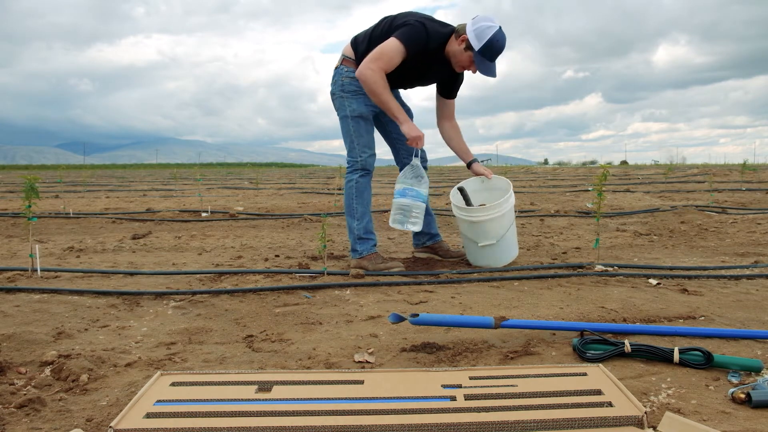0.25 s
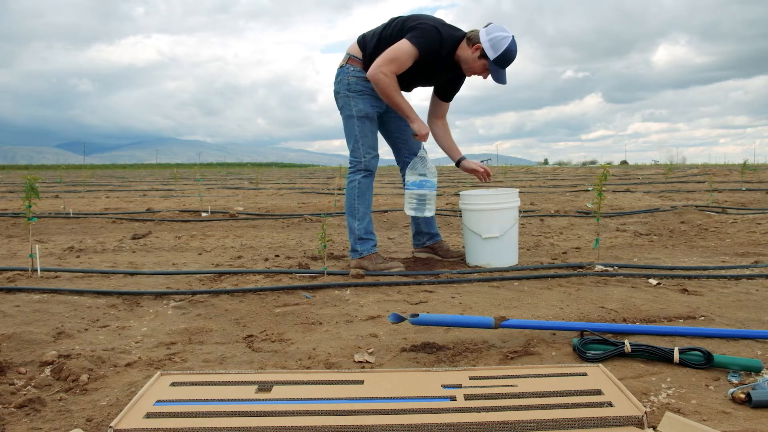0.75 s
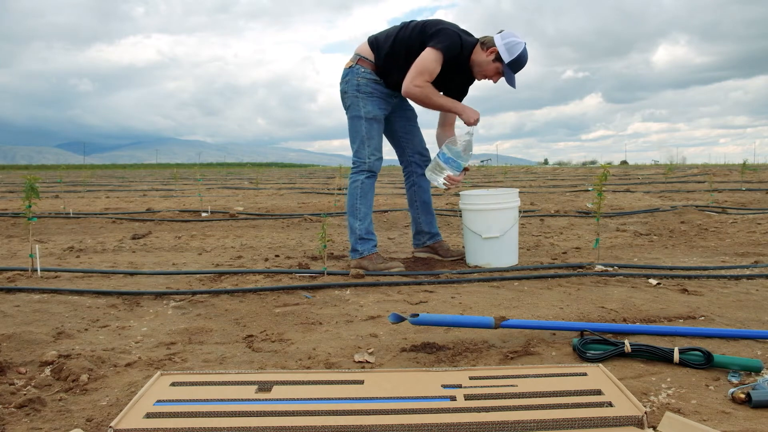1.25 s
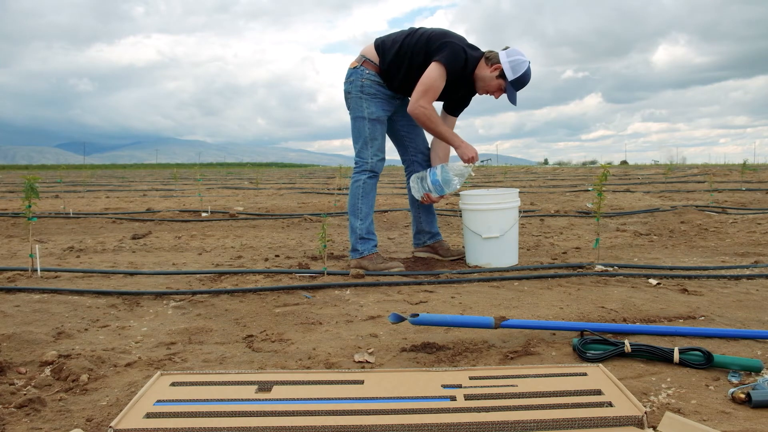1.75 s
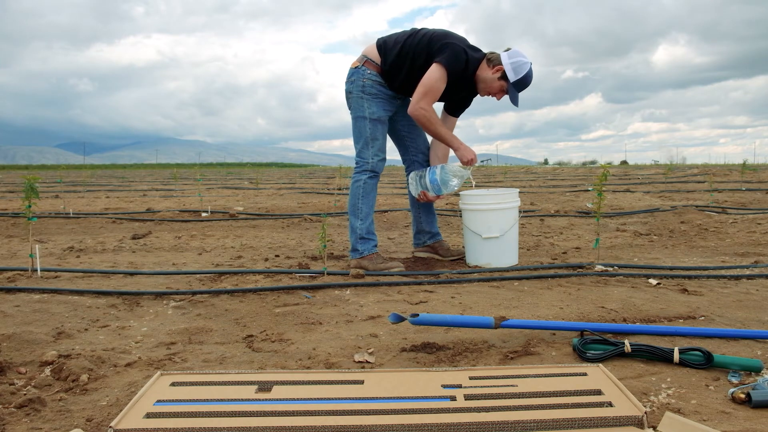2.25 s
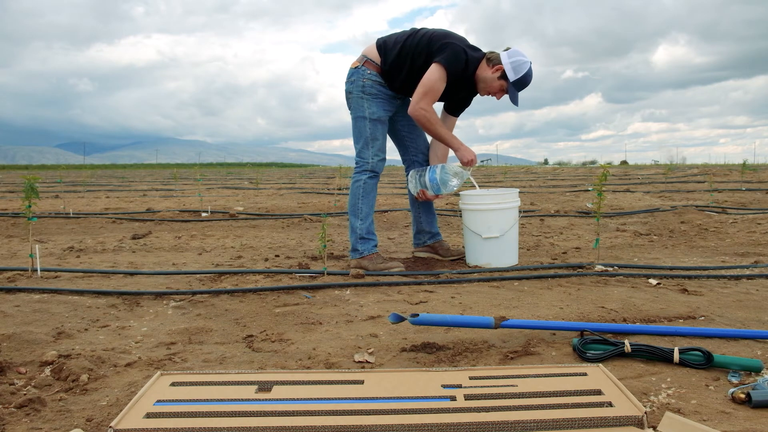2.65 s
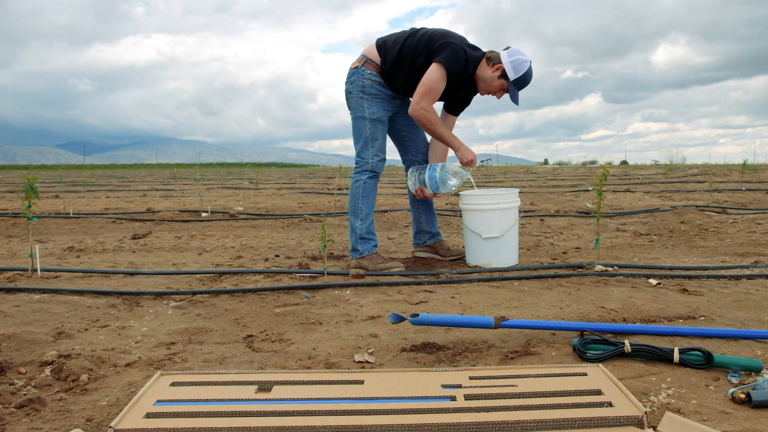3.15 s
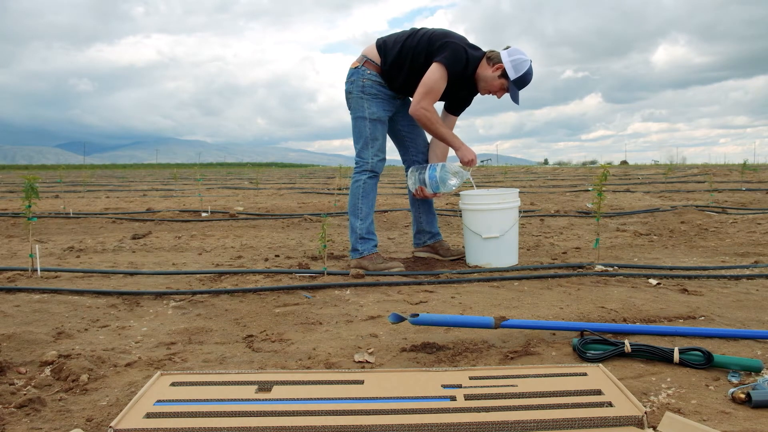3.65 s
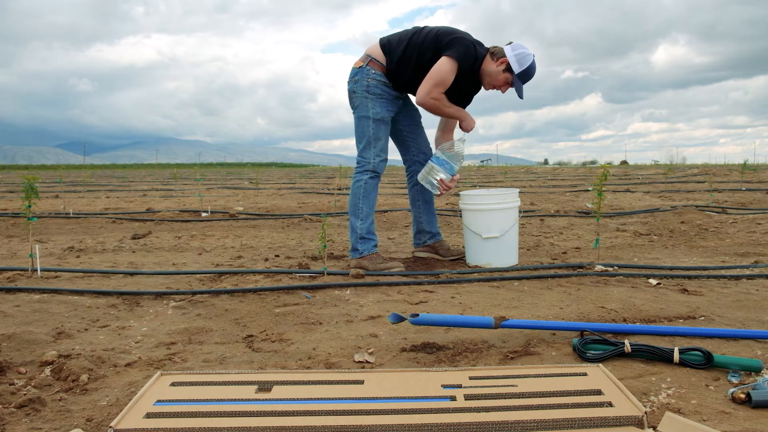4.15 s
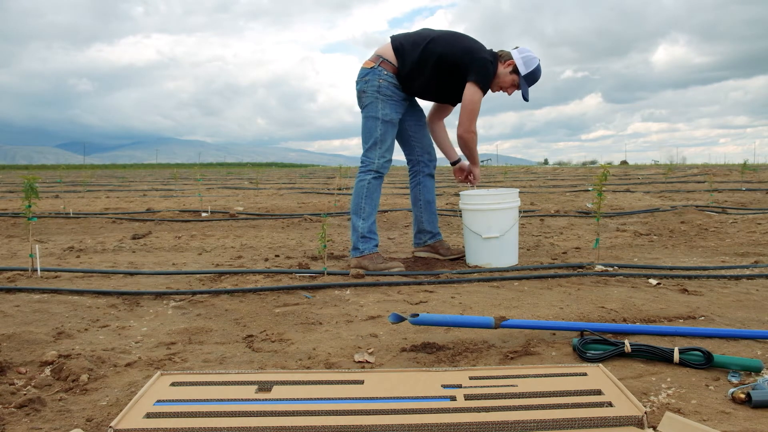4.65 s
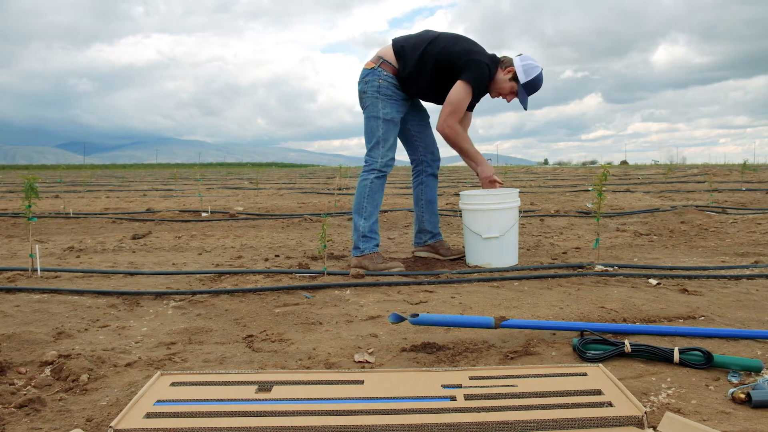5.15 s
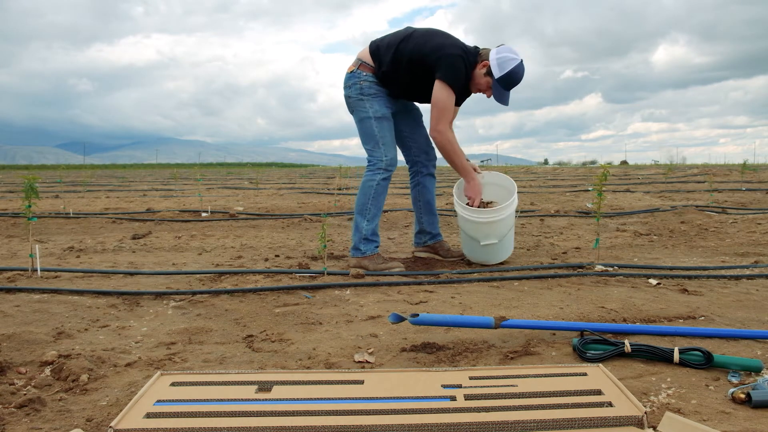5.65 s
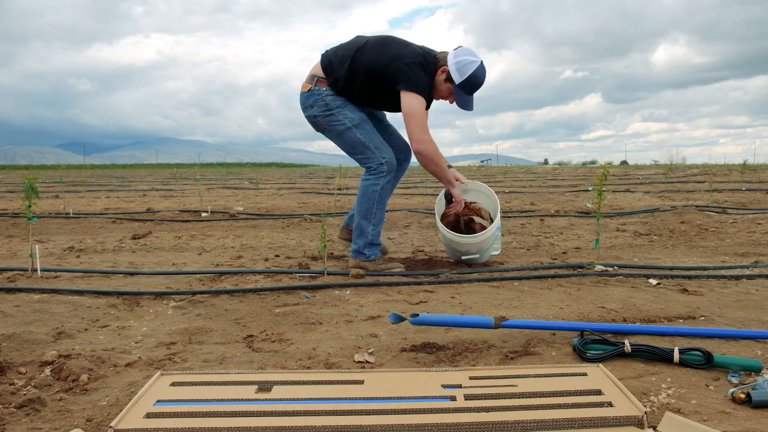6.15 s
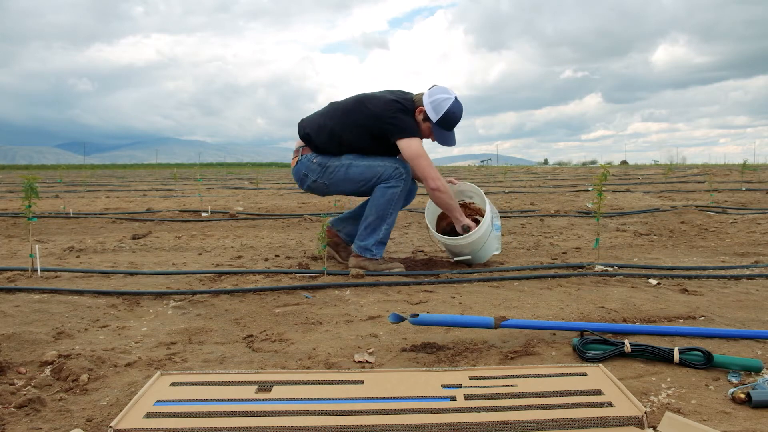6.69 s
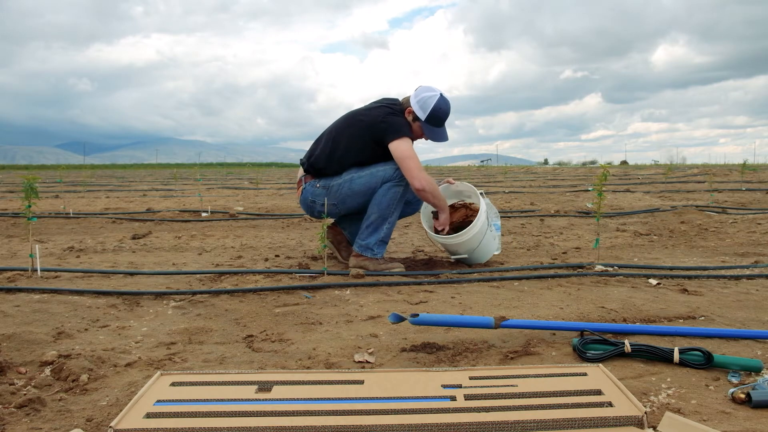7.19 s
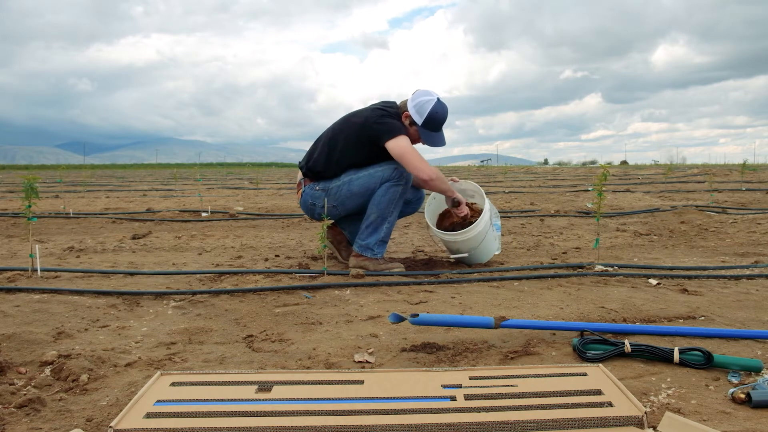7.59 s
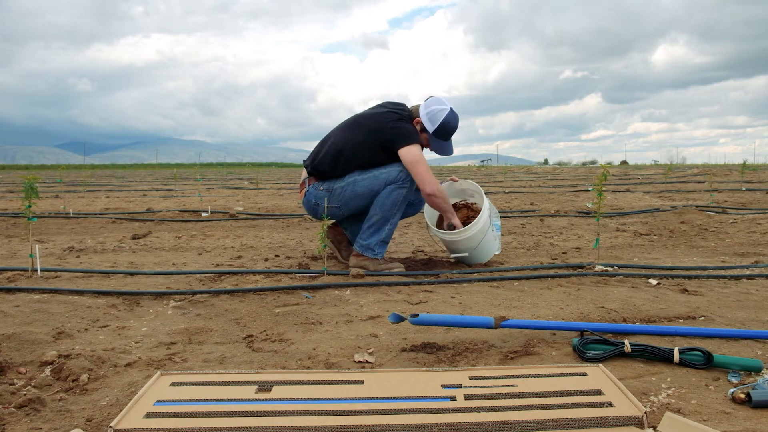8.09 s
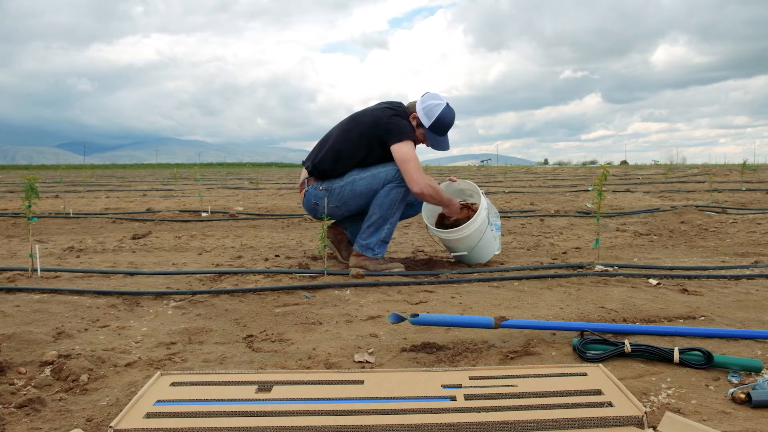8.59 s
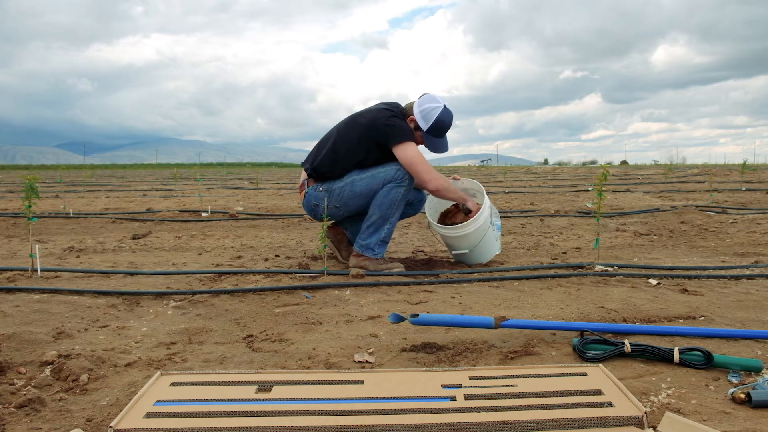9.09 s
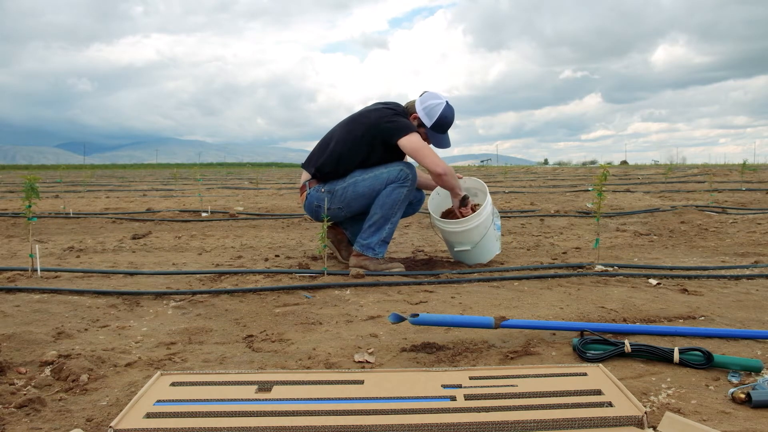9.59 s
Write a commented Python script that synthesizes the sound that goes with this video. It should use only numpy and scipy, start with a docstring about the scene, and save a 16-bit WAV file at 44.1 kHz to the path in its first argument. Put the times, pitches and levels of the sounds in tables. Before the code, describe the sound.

In an open field, quiet jug pouring gives way to loud, irregular gritty stirring and drumlike knocks inside a plastic bucket, under low wind.

```python
"""Wind rumble on the microphone and two bands of insect buzz over a faint field hiss are heard first.
Knocks and scrapes then set a plastic bucket down, soft hollow bumps follow, and a jug pours water in gulps.
Last a hand stirs gritty mud: clods and pebbles knock and scrape the wall, whose drum tone booms.
Noise shaped by resonances gives the wall, wind and insects; damped sines give drops, grit and hollow tones."""
import sys
import numpy as np
from scipy import signal
from scipy.fft import rfft, irfft, next_fast_len
from scipy.io import wavfile
from scipy.ndimage import uniform_filter1d, map_coordinates

SR = 44100
rng = np.random.default_rng(int(sys.argv[2]) if len(sys.argv) > 2 else 0)


def digitize_waveform(pressure):
    """Quantize a signal to 16-bit integers and store it at the path in sys.argv[1].

    Rows of a 2-D input are taken as channels; values are limited to [-1, 1].
    """
    field = np.atleast_2d(pressure).T
    bounded = np.clip(field, -1, 1)
    quanta = np.round(bounded * 32767).astype(np.int16)
    wavfile.write(sys.argv[1], SR, quanta)


def invert_db(x):
    """Field ratio 10**(x/20) for x, a level in decibels (scalar or array-like)."""
    u = np.asarray(x, float) / 20
    return 10 ** u


N = 433503  # length in samples

# mud and fingers dragged along the wall, one row a stroke; the last column is the gain of the low body:
# [start_s, end_s, start_db, end_db, body_gain_db]
STROKES = [(0.436, 0.517, -42, -46.5, 3.5), (0.592, 0.666, -42, -49, 6.5),
           (5.263, 5.66, -59.5, -54.5, -4.5), (5.994, 6.042, -29.5, -43.5, 3),
           (6.083, 6.424, -58, -50.5, -7.5), (6.581, 6.665, -32, -33.5, -1.5),
           (6.739, 6.952, -35, -34, -1.5), (6.988, 7.255, -32.5, -34.5, -1.5),
           (7.62, 7.8, -41, -46.5, -4.5), (7.974, 8.209, -27, -30, 0), (8.27, 8.477, -34, -32, 3.5),
           (8.727, 8.762, -26.5, -27, -1), (8.778, 8.935, -44, -64, -2.5), (9.11, 9.184, -39, -58.5, 5.5),
           (9.207, 9.316, -33, -33.5, -12), (9.345, 9.5, -44.5, -46, -6.5), (9.497, 9.562, -55, -33, -3),
           (9.606, 9.722, -36, -67, -6.5), (9.772, 9.832, -51.5, -30, -4)]
# resonances of the bucket wall, lowest first: [pitch_hz, width_hz, level_db]
WALL_MODES = [(221, 32.7, 8.5), (416, 150, 4), (573, 137, 2), (1100, 250, 1.5), (1600, 1500, -4),
              (2400, 600, 2.5), (4050, 2240, -10.5)]
# narrow wall tones that wet grit sets singing: [pitch_hz, width_hz]
SINGING_TONES = [(640, 62), (1090, 44), (1800, 82), (2180, 70), (2480, 80)]
# clods and the ground striking the wall: [start_s, level_db, boom_gain_db, ring_hz, t60_s]
KNOCKS = [(0.5975, -17.5, -5.5, 1960, 0.044), (1.905, -23.5, -37, 5300, 0.015),
          (5.9951, -36, 6, 1230, 0.016), (6.573, -15, -11, 1800, 0.032), (6.688, -19.5, -25, 2380, 0.012),
          (7.629, -20, -48, 1430, 0.037), (7.6635, -26.5, -34, 1210, 0.047), (7.815, -15, -11, 2400, 0.078),
          (7.9024, -13, -11, 2180, 0.041), (9.1028, -20.5, -3, 1840, 0.034), (9.12, -21, -8, 2550, 0.032),
          (9.4066, -26, -10.5, 1200, 0.055), (9.7057, -33, -12, 2130, 0.061),
          (9.8026, -21, -6.5, 1600, 0.031)]
# clods that slip and swell rather than strike: [start_s, level_db, ring_hz]
SLIPS = [(0.4, -38.5, 1100), (0.426, -39.5, 1170), (6.638, -24, 2400), (6.939, -27.5, 1370),
         (6.975, -27, 1050), (7.026, -26.5, 1910), (7.064, -30, 2220), (7.188, -22.5, 2170),
         (7.961, -21.5, 2500), (7.792, -42.5, 1500), (7.886, -33, 2160), (7.981, -15.5, 1520),
         (8.125, -25.5, 1060), (8.1527, -20.5, 2370), (8.302, -24.5, 2050), (8.3984, -25.5, 1980),
         (8.4402, -25, 1000), (8.93, -37.5, 2380), (9.594, -34, 2200), (9.605, -25, 2440)]
# single grains of grit cracking under the hand: [start_s, level_db]
SNAPS = [(6.012, -22), (6.816, -26), (6.8404, -33), (6.8907, -33), (6.988, -27), (7.1425, -26.5),
         (7.2174, -26), (7.4769, -30.5), (8.0356, -17), (8.2564, -22), (8.345, -22)]
# a pebble clacking on bare plastic: [start_s, peak_db]
CLACKS = [(7.455, -17.5), (8.626, -5), (8.647, -10.5)]
# resonances of the pebble clack: [pitch_hz, width_hz, level_db]
PEBBLE_MODES = [(2200, 630, 6.7), (2920, 900, 6.5), (3340, 314, 12.3), (4700, 350, 6.4)]
# drops and crumbs ticking on the wall: [start_s, level_db, ring_hz]
TICKS = [(2.733, -53, 3400), (3.131, -53.5, 2210), (3.182, -59, 3030), (3.198, -54.5, 4930),
         (3.234, -57, 5400), (3.394, -60, 3600), (3.436, -50.5, 2330), (3.508, -54.5, 2450),
         (4.014, -52, 1665), (4.0871, -53, 2030), (4.148, -51, 756), (4.15, -54.5, 3600),
         (5.036, -51, 2630), (5.058, -53.5, 3080), (5.3139, -52.5, 1780), (5.428, -53.5, 2270),
         (5.695, -48, 2200), (5.758, -47, 2080), (5.8396, -56.5, 3540), (5.852, -54.5, 2110),
         (6.14, -51.5, 2450), (6.3952, -46.5, 2220), (7.577, -49.5, 2500)]
# gulps of water leaving the jug: [start_s, end_s, start_db, end_db]
GULPS = [(2.327, 2.55, -59, -66), (2.658, 2.96, -63, -61), (3.038, 3.193, -52, -51),
         (3.294, 3.544, -57, -53), (3.66, 3.933, -56.5, -60), (3.969, 4.224, -53, -57)]
# resonances that the spray rings on the wall: [pitch_hz, width_hz, level_db]
SPRAY_MODES = [(2400, 71, 16.5), (3450, 77, -3), (770, 600, 13)]
# soft bumps of the jug on bucket and ground: [start_s, level_db, t60_s, favoured_ring_hz]
BUMPS = [(1.022, -35.5, 0.2, 225), (1.042, -42, 0.081, 503), (4.781, -33.5, 0.087, 576),
         (4.85, -40.5, 0.17, 270), (5.066, -40, 0.13, 480), (5.184, -36.5, 0.1, 234)]
# hollow modes of jug and bucket: [pitch_hz]
HOLLOW_HZ = [204.4, 264.4, 353, 465, 532, 766]
# course of the background: [time_s, wind_db, chorus_db]
FIELD_COURSE = [(0, -33.5, -57.5), (1, -43, -61), (1.75, -45, -54), (2.2, -40, -59), (2.6, -45.5, -65),
                (4.7, -42, -62.5), (5.3, -37.5, -70.5), (5.9, -47, -64.5), (6.7, -48, -55.5),
                (8.7, -38, -58.5), (9.83, -43.5, -56.5)]
# spectral shape of the wind rumble: [frequency_hz, relative_db_per_hz]
RUMBLE_SHAPE = [(15, 6.5), (29, 2.5), (124, -17), (197, -23.5), (650, -48.5), (1100, -120)]
# spectral shape of the field hiss: [frequency_hz, relative_db_per_hz]
HISS_SHAPE = [(100, 5), (500, -6), (1200, -11.5), (3300, -18.5), (7500, -23.5), (16000, -26)]
# resonance of the upper insect band, applied twice: [pitch_hz, width_hz, level_db]
CHORUS_MODES = [(5100, 1150, 0)]
# resonance of the steady lower buzz, applied twice: [pitch_hz, width_hz, level_db]
DRONE_MODES = [(1640, 290, 0)]

GRIP, LET_GO = 0.16, 0.21  # attack and release of a stroke, as shares of its length
FIZZ_DB, SING_DB = -12.5, -9  # relative to the drag
DRUM_DB, DRUM_GROWTH = -13.5, 1.62  # hum re drag in the hardest stroke; exponent of its growth with the stroke
BODY_HZ = 1500  # below this a full hand of mud sounds more than fingertips do
HARD_DB = -23.5  # a knock's crack gain is its level above this
SLIP_S = 0.0048  # a slip peaks this long after it starts
GUSH_S, TRAIL_S = 0.013, 0.029  # a gulp sets in and trails off
HOLLOW_DB_PER_OCTAVE = 13  # loss of a hollow mode away from the favoured ring


def stirring():
    """Stick-slip friction: clumped grit excites wall modes and singing tones; bare grains give fizz."""
    clumps = 1.6 * wobble(45)
    wall_grains = grains(count=20000, centre_hz=1700, octaves=1.3, cycles=2, spread_db=4, glide=0)
    rub = rng.standard_normal(N) + wall_grains
    drag = invert_db(clumps + 1.4 * wobble(120)) * filtered(rub, modes(WALL_MODES))
    drag = patchy(drag, depth_db=2)

    # each tone comes and goes on its own
    tones = [unit(filtered(rub, modes([(hz, width, 0)]))) for hz, width in SINGING_TONES]
    singing = unit(sum(invert_db(5 * wobble(14)) * tone for tone in tones))

    bare_grains = grains(count=12000, centre_hz=6330, octaves=1.0, cycles=0.31, spread_db=3, glide=0)
    grit = rng.standard_normal(N) + 2.1 * bare_grains
    bright = filtered(grit, lambda f: highpass(f, 3500) ** 2 / (1 + 1j * f / 9500) ** 2)
    fizz = patchy(invert_db(clumps + 2.6 * wobble(70)) * bright, depth_db=5.0)

    hand, palm = np.zeros(N), np.zeros(N)
    for start, end, start_db, end_db, body_db in STROKES:
        length = end - start
        move = gesture(start, end, start_db, end_db, GRIP * length, LET_GO * length)
        hand += move
        palm += invert_db(body_db) * move

    drum = unit(filtered(rub, modes(WALL_MODES[:1])))
    hum = invert_db(DRUM_DB) * hand.max() * (hand / hand.max()) ** DRUM_GROWTH * drum
    mud = drag + invert_db(SING_DB) * singing
    body = filtered(mud, lambda f: 1 / (1 + (f / BODY_HZ) ** 4))
    return hum + palm * body + hand * (mud - body + invert_db(FIZZ_DB) * fizz)


def knocks():
    """Impact excitation: a sharp blow rings and cracks, and the wall's lowest modes boom."""
    out, t = np.zeros(N + SR), np.arange(SR // 5) / SR
    for start, db, boom_db, hz, t60 in KNOCKS:
        envelope = invert_db(-60 * t / max(t60, .008)) * (1 - np.exp(-t / 0.0013))
        strike = blow(hz, envelope, crack_db=db - HARD_DB)
        place(out, start, invert_db(db) * (strike + invert_db(boom_db) * boom(t, rise=0.00014)))
    return out[:N]


def slips():
    """Gradual release: a slipping clod swells to its peak and dies away with little crack."""
    out, t = np.zeros(N + SR), np.arange(SR // 5) / SR
    for start, db, hz in SLIPS:
        swell = (t / SLIP_S * np.exp(1 - t / SLIP_S)) ** 2
        place(out, start, invert_db(db) * blow(hz, swell, crack_db=-2, width=0.32))
    return out[:N]


def snaps():
    """Brittle fracture: a cracking grain is a brief wideband burst over a weak ring of random pitch."""
    out, t = np.zeros(N + SR), np.arange(SR // 5) / SR
    for start, db in SNAPS:
        envelope = 0.43 * invert_db(-60 * t / 0.015)
        place(out, start, invert_db(db) * blow(rng.uniform(2000, 6700), envelope, crack_db=17, width=0.79))
    return out[:N]


def clacks():
    """Hard impact: a decaying noise burst excites the pebble's resonances, with the bass removed."""
    out, t = np.zeros(N + SR), np.arange(SR // 5) / SR
    for start, db in CLACKS:
        burst = invert_db(-60 * t / 0.034) * rng.standard_normal(len(t))
        ring = filtered(burst, lambda f: (0.05 + modes(PEBBLE_MODES)(f)) * highpass(f, 2000) ** 4)
        place(out, start, invert_db(db) * ring / np.abs(ring).max())
    return out[:N]


def ticks():
    """Light impact with bubble resonance: a short rattle and a damped sine share one pitch."""
    out, t = np.zeros(N + SR), np.arange(SR // 5) / SR
    for start, db, hz in TICKS:
        bubble = 2.1 * invert_db(-60 * t / 0.064) * np.sin(2 * np.pi * hz * t)
        rattle = blow(hz, t / 0.0014 * np.exp(1 - t / 0.0033), crack_db=-35)
        place(out, start, invert_db(db) * (rattle + bubble))
    return out[:N]


def pouring():
    """Bubble resonance and spatter in uneven gushes, while the jet excites the bucket's air into a hum."""
    gushes = invert_db(2.5 * wobble(70))
    drops = grains(count=2500, centre_hz=2300, octaves=1.3, cycles=6, spread_db=4.5, glide=.002, size=500)
    spatter = grains(count=6000, centre_hz=4300, octaves=1.1, cycles=1.6, spread_db=4.5, glide=0)
    patter = unit(filtered(rng.standard_normal(N), modes(SPRAY_MODES)))
    splash = unit(gushes * (drops + 1.17 * spatter + 1.3 * patter))
    hum = unit(filtered(rng.standard_normal(N), modes([(196.0, 6.0, 0)])))
    filling = np.interp(np.arange(N) / SR, [3, 3.2, 4.5, 4.7], [0, 1, 1, 0])
    flow = sum(gesture(*row, GUSH_S, TRAIL_S) for row in GULPS)
    return flow * splash + invert_db(-59.5) * filling * hum


def bumps():
    """Selective modal excitation: a soft thud rings the nearest hollow modes most; low ones last longest."""
    out, t = np.zeros(N + SR), np.arange(SR // 4) / SR
    for start, db, t60, hz in BUMPS:
        push = invert_db(db - 60 * t / t60) * (1 - np.exp(-t / 0.0036))
        thud_shape = modes([(1.5 * hz, 2 * hz, 0)])
        thud = unit(filtered(rng.standard_normal(len(t)), lambda f: thud_shape(f) ** 2))
        ring = np.zeros(len(t))
        for mode_hz in HOLLOW_HZ:
            loss_db = HOLLOW_DB_PER_OCTAVE * abs(np.log2(mode_hz / hz))
            extra_decay_db = 60 * t / t60 * (mode_hz / hz - 1)  # on top of the push; negative for low modes
            cycles = mode_hz * rng.normal(1, 0.037) * t + rng.random()
            ring += invert_db(-loss_db - extra_decay_db) * np.sin(2 * np.pi * cycles)
        place(out, start, push * (1.86 * ring + invert_db(-12 * t / t60) * thud))
    return out[:N]


def field():
    """Spectrally shaped noise: gusty rumble on the microphone, hiss, and two resonant insect bands."""
    wind_db, chorus_db = curves(FIELD_COURSE)
    rumble = unit(filtered(rng.standard_normal(N), lambda f: along(RUMBLE_SHAPE, f)))
    hiss = unit(filtered(rng.standard_normal(N), lambda f: along(HISS_SHAPE, f)))
    upper_buzz = filtered(rng.standard_normal(N), lambda f: modes(CHORUS_MODES)(f) ** 2)
    chorus = unit(invert_db(0.43 * wobble(44)) * upper_buzz)
    drone = unit(filtered(rng.standard_normal(N), lambda f: modes(DRONE_MODES)(f) ** 2))
    return invert_db(wind_db) * rumble + invert_db(-55) * hiss + invert_db(chorus_db) * chorus + invert_db(-65.0) * drone


def blow(hz, envelope, crack_db, width=0.5):
    """Struck resonance: a noise-fed ring under a wide crack that is over sooner; width is re pitch."""
    rattle, snap = rng.standard_normal((2, len(envelope)))
    ring = unit(filtered(rattle, modes([(hz, width * hz, 0), (1.05 * hz, 1.39 * hz, -10)])))
    crack = invert_db(crack_db) * filtered(snap, lambda f: highpass(f, 1500) / (1 + 1j * f / 7000) ** 2)
    return envelope * (ring + envelope * crack)


def boom(t, rise):
    """Modal decay: the three lowest wall modes ring like a drum, wider ones dying sooner."""
    ring = np.zeros(len(t))
    for hz, width, db in WALL_MODES[:3]:
        tone = np.sin(2 * np.pi * hz * rng.normal(1, 0.042) * t)
        ring += invert_db(db) * np.exp(-np.pi * width * t) * tone
    ring *= 1 - np.exp(-t / rise)
    return filtered(ring, lambda f: highpass(f, 110) ** 2)  # a small drum radiates no deep bass


def grains(count, centre_hz, octaves, cycles, spread_db, glide, size=320):
    """Granular excitation: scattered soft-starting damped sines of total rms 1; positive glide raises pitch."""
    at, pitch, chance = rng.random((3, count, 1))
    hz = centre_hz * 2 ** (octaves * (2 * pitch - 1))
    n = np.arange(size)
    turn = hz * n / SR  # cycles since the grain began
    shape = turn * np.exp(-turn / cycles) * (1 - n / len(n))
    loudness = invert_db(-spread_db * np.log(chance + 0.044))  # a few grains are much louder
    wave = loudness * shape * np.sin(2 * np.pi * turn * (1 + glide * turn))
    places = (at * N).astype(int) + n
    return unit(np.bincount(places.ravel(), wave.ravel(), N)[:N])


def gesture(start, end, start_db, end_db, attack, release):
    """Gain of one movement: it swells up to its start, slides in level to its end, then dies away."""
    t = np.arange(N) / SR
    edges = np.clip((start - t) / attack, 0, None) + np.clip((t - end) / release, 0, None)
    return invert_db(np.interp(t, [start, end], [start_db, end_db]) - 20 * edges ** 2)


def patchy(x, depth_db):
    """Random time-frequency gain: drifting patches a few hundred Hz by some tens of ms; rms 1."""
    z = signal.stft(x, nperseg=256)[2]
    patches = uniform_filter1d(rng.standard_normal(z.shape), size=3, axis=0)
    patches = uniform_filter1d(patches, size=14, axis=1)
    return unit(signal.istft(z * invert_db(depth_db * unit(patches)), nperseg=256)[1][:N])


def modes(table):
    """Modal superposition: causal response of a set of resonances with alternating signs."""
    def response(f):
        total = 0
        for k, (centre, width, db) in enumerate(table):
            total = total + (-1) ** k * invert_db(db) * 1j * f * width / (centre ** 2 - f ** 2 + 1j * f * width)
        return total
    return response


def highpass(f, corner_hz):
    """First-order high-pass response."""
    return 1j * f / (corner_hz + 1j * f)


def filtered(x, response):
    """Linear filtering: the spectrum of x times a response of frequency in Hz."""
    m = next_fast_len(len(x) + 8192)  # room for the ringing
    return irfft(rfft(x, m) * response(np.fft.rfftfreq(m, 1 / SR)), m)[:len(x)]


def along(points, hz):
    """Spectral envelope: (Hz, dB) points read on a log frequency axis, as gain."""
    f, db = np.transpose(points)
    return invert_db(np.interp(np.log(hz + 1), np.log(f + 1), db))


def curves(rows):
    """Linear interpolation: one value a sample for each column after the time; -120 outside the rows."""
    s, *cols = np.transpose(rows)
    return [np.interp(np.arange(N) / SR, s, c, left=-120, right=-120) for c in cols]


def wobble(rate):
    """Slow random modulation: a smooth curve through random knots, rate knots a second."""
    return map_coordinates(rng.standard_normal(int(N * rate / SR) + 4), [np.arange(N) * rate / SR])


def unit(x):
    """Level normalisation: x scaled to rms 1."""
    return x / np.sqrt(np.mean(x ** 2) + 1e-20)


def place(out, start, sound):
    """Superposition: adds a sound to out from start, in seconds."""
    out[round(start * SR):][:len(sound)] += sound


def scene():
    """Superposition: all sources add at one microphone in the open."""
    contacts = knocks() + slips() + snaps() + clacks() + ticks()
    return (stirring() + contacts + pouring() + bumps() + field())[None]


def low_pass(x):
    """Removes everything above the highest recorded frequency."""
    return signal.sosfilt(signal.butter(12, 16470, fs=SR, output="sos"), x)


def record(dry):
    """Band limiting: the microphone fades above 13 kHz and stops near 16 kHz."""
    heard = filtered(dry[0], lambda f: (f < 15930) / np.sqrt(1 + (f / 13500) ** 12))
    return low_pass(heard[None])


dry = scene()
out = record(dry)
digitize_waveform(out)
```